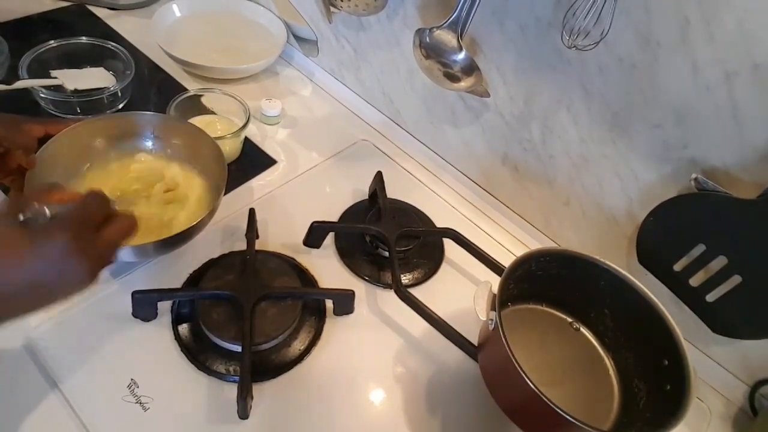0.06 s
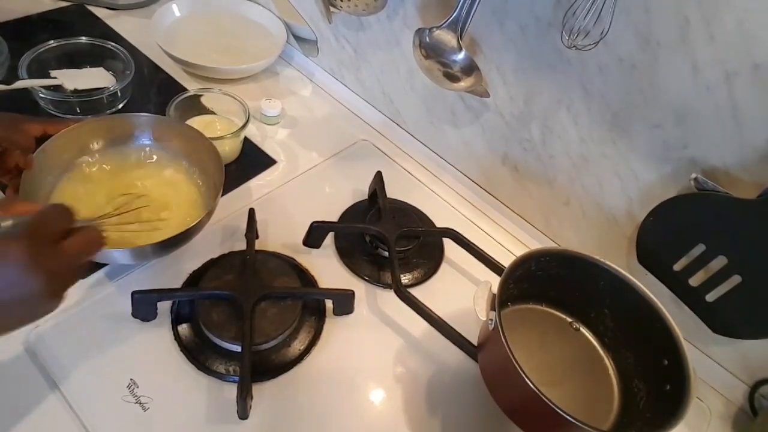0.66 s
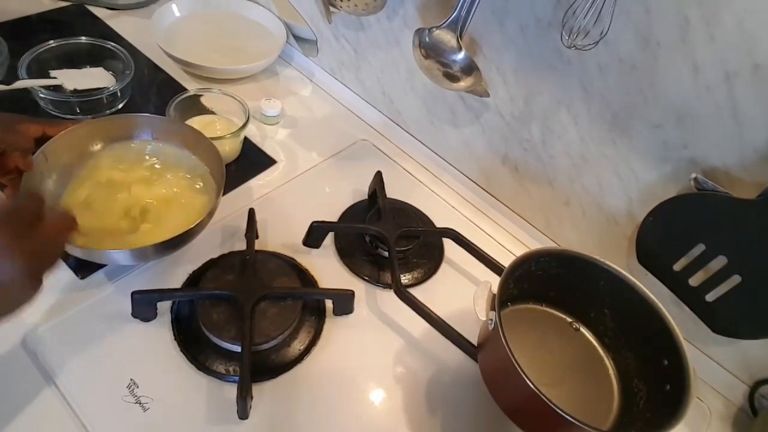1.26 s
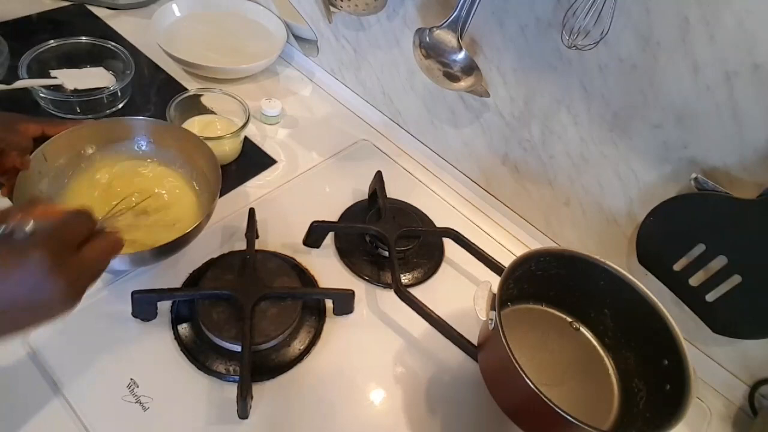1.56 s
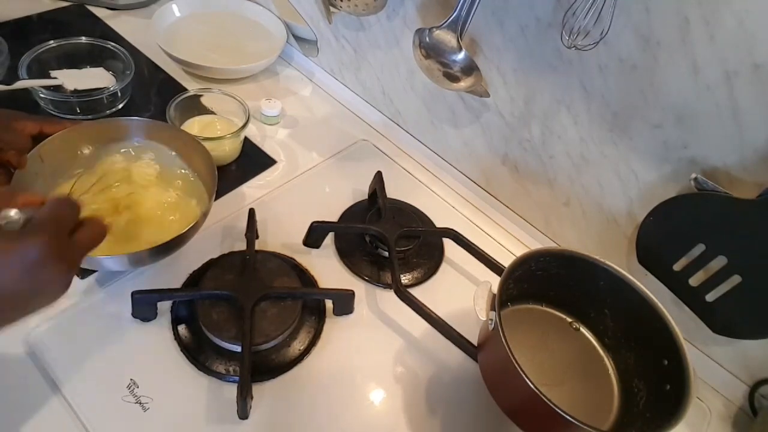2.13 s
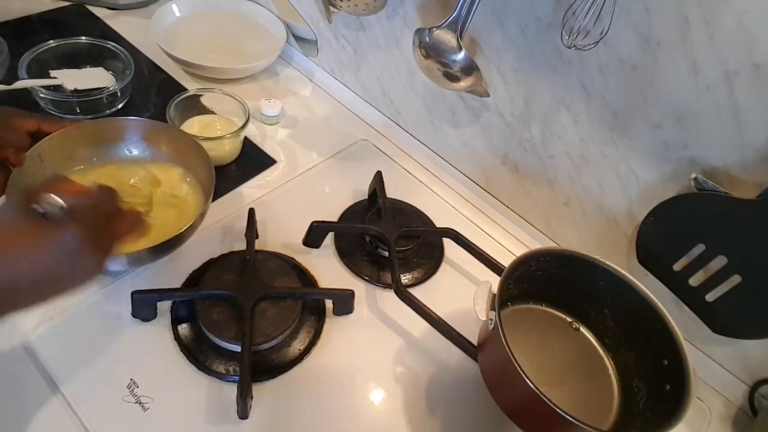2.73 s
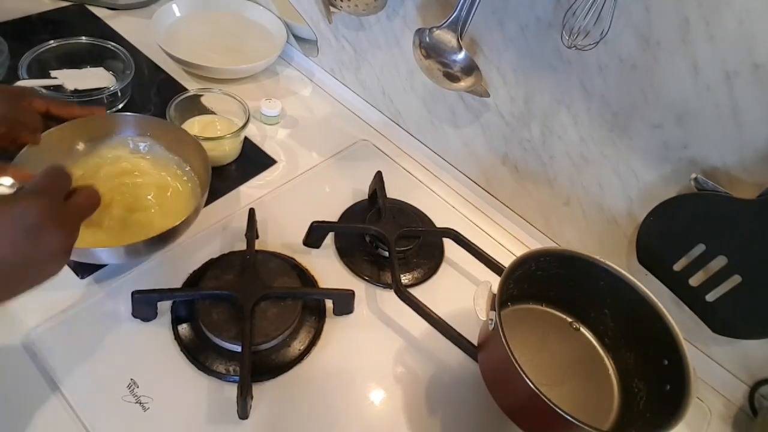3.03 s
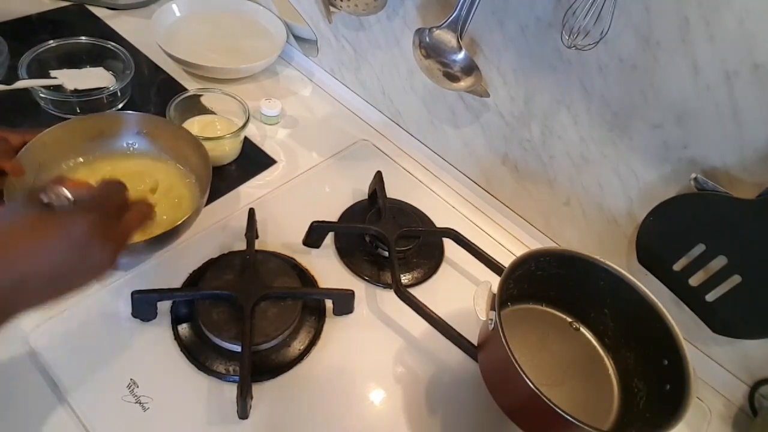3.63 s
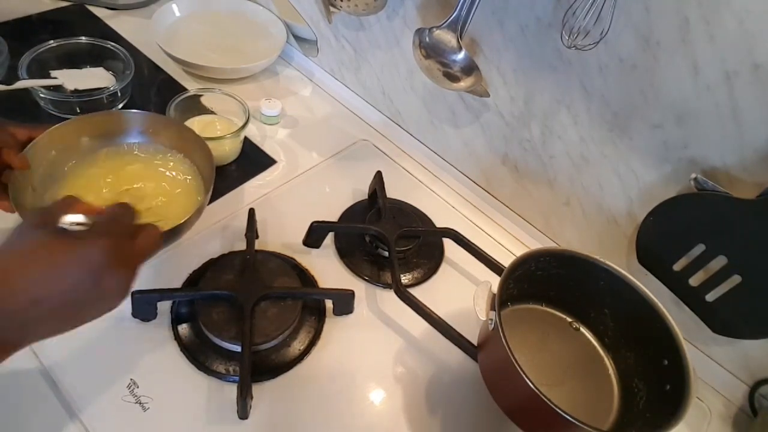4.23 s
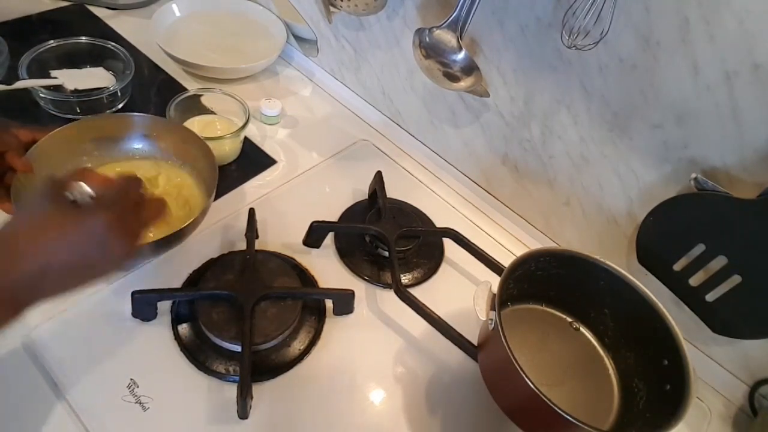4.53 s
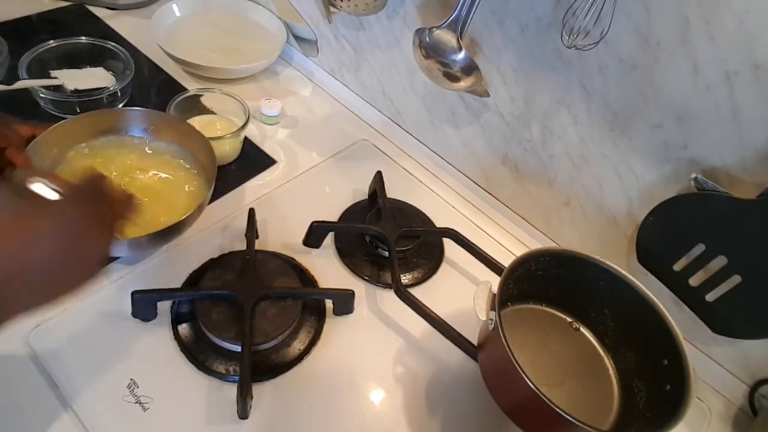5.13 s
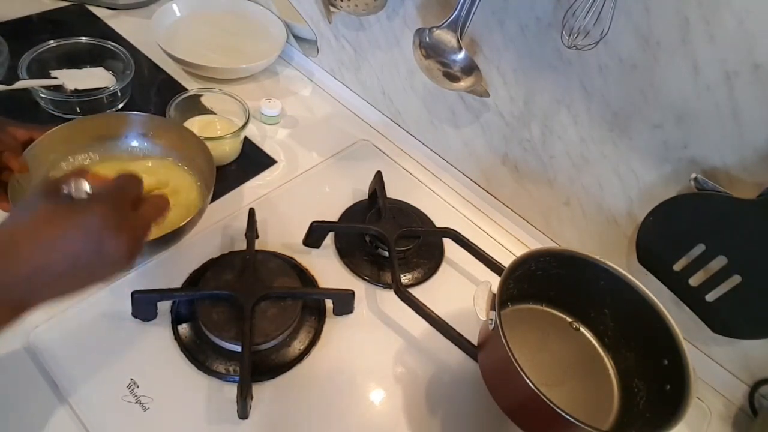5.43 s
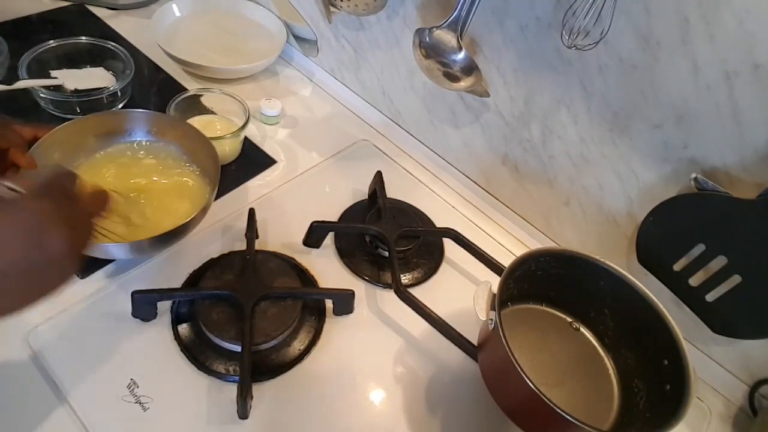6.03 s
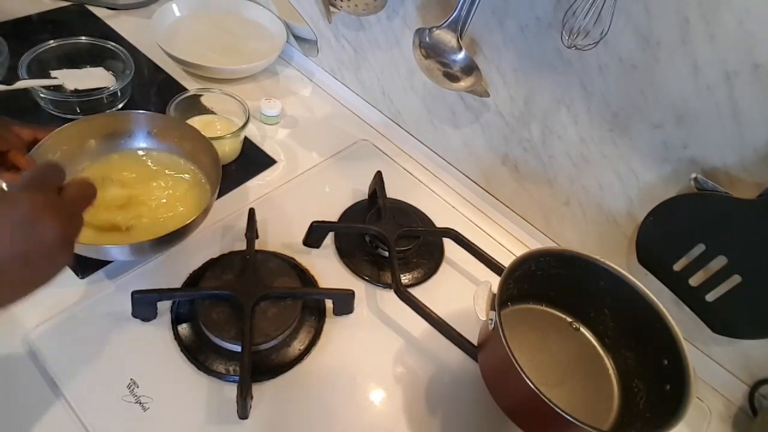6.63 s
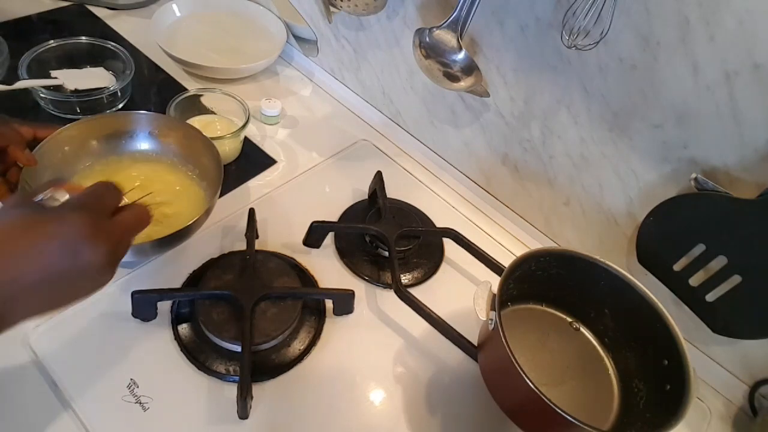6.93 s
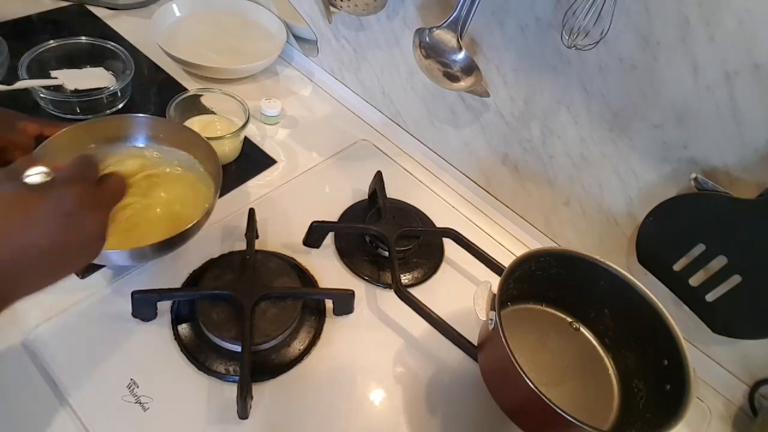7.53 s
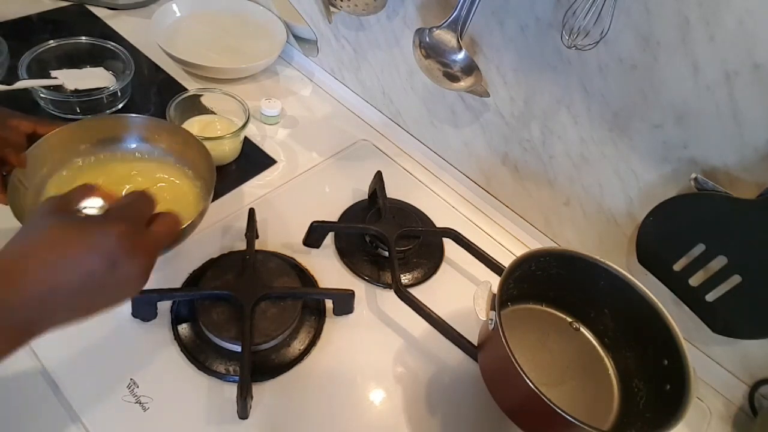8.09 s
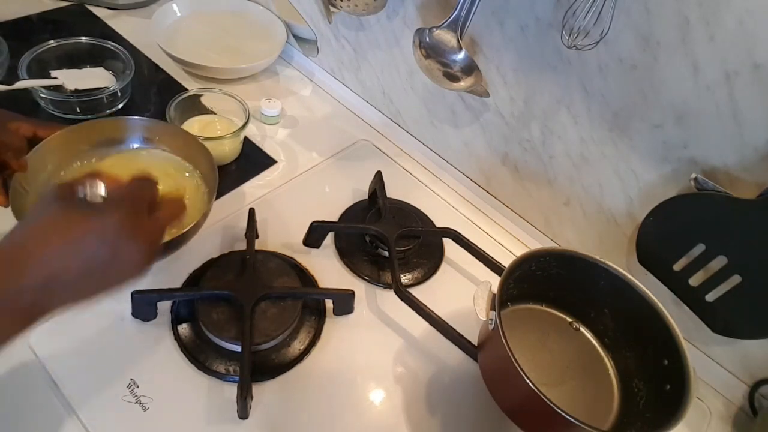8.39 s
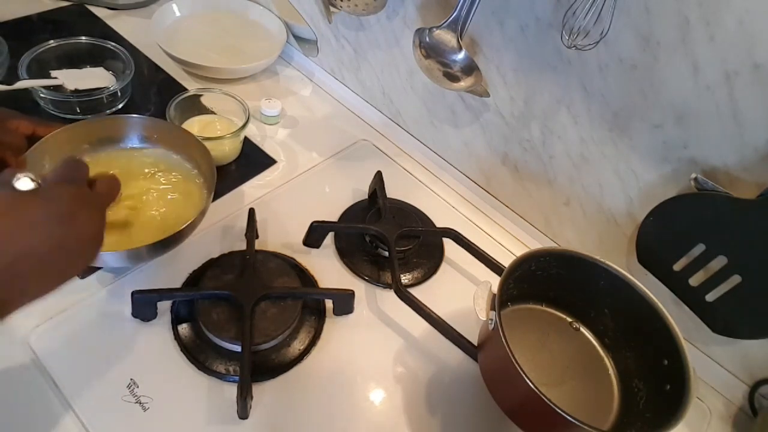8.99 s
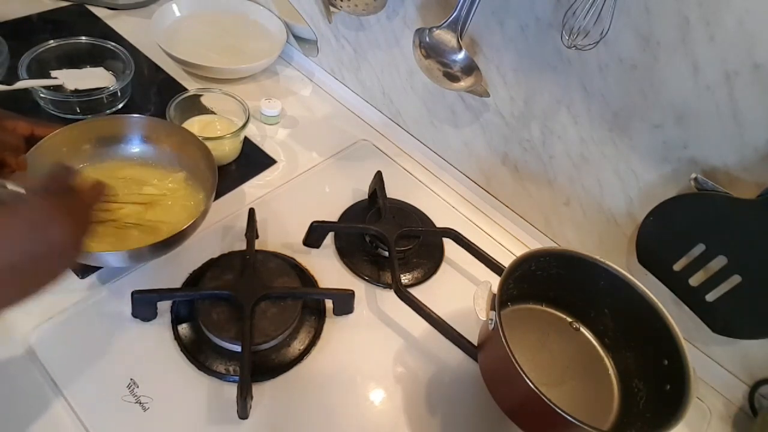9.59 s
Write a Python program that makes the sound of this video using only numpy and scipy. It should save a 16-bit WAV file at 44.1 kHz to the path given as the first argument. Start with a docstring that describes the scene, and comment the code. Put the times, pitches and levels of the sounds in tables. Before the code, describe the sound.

Quick, continuous whisking in a stainless steel bowl: ticking wires, sloppy batter pops and a few sharper metal clinks.

```python
"""Whisk wires tap a stainless steel bowl of batter: a push and a return per turn, about nine strokes/s.
The wires rattle on the damped bowl, the batter squelches, air pockets pop, steel clinks now and then.
The bowl stands on a hob in a small kitchen; the worktop thuds under the strokes, over a faint hum.
The right microphone hears it all; the muffled left one gets little but rumble and hiss."""
import sys
import numpy as np
from scipy import signal
from scipy.fft import rfft, irfft
from scipy.io import wavfile
from scipy.ndimage import uniform_filter1d

SR = 44100
rng = np.random.default_rng(int(sys.argv[2]) if len(sys.argv) > 2 else 0)


def log_audio(samples):
    """Write samples as a 16-bit WAV file to the path given in sys.argv[1]."""
    # one column per channel
    frames = np.atleast_2d(samples).T
    # limit to full scale, then quantise
    limited = np.clip(frames, -1, 1)
    pcm = np.round(limited * 32767).astype(np.int16)
    wavfile.write(sys.argv[1], SR, pcm)


N = 429975
TIME_S = np.arange(N) / SR
EVENT_S = TIME_S[:SR // 6]  # time axis of one blow

# Table levels are relative, ahead of the mix gains.
# circling of the whisk: (time [s], turns done [count])
WHISK_TURNS = [(-0.07, 0), (1.1, 5), (1.98, 9), (2.875, 13), (3.805, 17), (4.02, 18), (4.47, 20),
               (4.96, 22), (5.19, 23), (6.275, 28), (6.9, 31), (7.405, 33), (7.87, 35), (8.345, 37),
               (8.85, 39), (9.07, 40), (9.71, 43)]
# hand: (time [s], batter drive [dB], wire pressure [dB], worktop push [dB], squelch pitch [Hz])
HAND_EFFORT = [(0, -54, -41, -79, 2020), (0.65, -55, -59, -59, 1514), (1.3, -54, -53, -57, 1393),
               (1.8, -54.5, -59, -61.5, 2316), (2.7, -51, -50, -47.5, 2610), (3.3, -56, -66, -49.5, 1726),
               (3.6, -55, -57, -62, 2410), (3.85, -49, -57, -54, 1970), (4.5, -50, -61, -52, 2604),
               (4.95, -54, -68, -50, 3004), (5.25, -48, -39, -47.5, 2250), (5.75, -49.5, -44, -48.5, 1830),
               (6.15, -53, -69, -46, 1735), (6.55, -48, -46, -48.5, 1102), (7.2, -53, -52, -48, 1488),
               (7.8, -49, -52.5, -46, 2840), (8.5, -58, -45.5, -55, 2415), (9.3, -50, -32, -45.5, 1506),
               (9.75, -47, -44, -45.5, 1706)]
# hard wire hits on the bowl: (time [s], level [dB], treble re level [dB])
HARD_TAPS = [(0.005, -47, -11.5), (0.147, -45.5, -11.5), (0.277, -56, -2.5), (0.625, -56, -3.5),
             (0.846, -44.5, -10.5), (1.461, -59.5, -1), (1.53, -63, 8), (1.745, -45.5, -13.5),
             (1.876, -59.5, 5), (1.978, -56, -2), (2.075, -42, -12), (2.198, -50.5, -3.5),
             (2.297, -45, -6.5), (2.518, -44.5, -16.5), (2.546, -59, -5), (2.645, -47.5, -17),
             (2.686, -47.5, -10), (2.741, -39.5, -10.5), (2.863, -41.5, -9.5), (2.887, -59, -3.5),
             (3.032, -53, -7.5), (3.243, -62, 0.5), (3.104, -50.5, -6.5), (3.333, -44.5, -14.5),
             (3.427, -44, -5.5), (3.838, -51.5, 0.5), (3.894, -43, -16), (4.004, -48, -16),
             (4.111, -43.5, -15), (4.203, -39.5, -4), (4.243, -44, -5.5), (4.33, -42.5, -9.5),
             (4.396, -47.5, -8.5), (4.463, -47.5, -5.5), (4.574, -40.5, -9.5), (4.682, -45, -6),
             (4.967, -55.5, 3.5), (5.16, -42.5, -9), (5.295, -45.5, -3), (5.368, -56.5, 0),
             (5.474, -41.5, -15.5), (5.517, -51, -3), (5.61, -50, -16), (5.728, -45, -17),
             (5.829, -44.5, -9.5), (6.05, -39.5, -8.5), (6.069, -45.5, -15), (6.263, -31.5, -16),
             (6.357, -47, -15), (6.372, -39, -19), (6.459, -48, -4.5), (6.467, -31.5, -13),
             (6.576, -40, -12.5), (6.673, -38, -16.5), (6.706, -42, -18), (6.78, -43.5, -8.5),
             (6.877, -52, -14), (6.889, -39.5, -15), (7.005, -40, -7.5), (7.14, -46.5, -17),
             (7.4, -60.5, 3.5), (7.591, -50, -3), (8.217, -43, -11.5), (8.28, -50.5, -2.5),
             (8.586, -41.5, -0.5), (8.604, -56, 6.5), (8.707, -49, -4.5), (8.841, -39, -4),
             (8.862, -49.5, -1), (8.903, -49.5, -9.5), (9.053, -37.5, -15), (9.148, -40.5, -10),
             (9.159, -43.5, -11.5), (9.261, -43, -10), (9.272, -34, -14.5), (9.366, -42.5, -6),
             (9.383, -40.5, -12.5), (9.409, -42.5, -12), (9.477, -42, -15), (9.506, -43.5, -19),
             (9.694, -37, -16.5), (9.718, -48, -12.5)]
# bowl, damped by batter and hand: (frequency [Hz], width [Hz], level [dB])
BOWL_MODES = [(572, 28, 0), (795, 30, -6), (905, 30, -5), (1000, 35, -2), (1065, 35, 1), (1155, 32, 2),
              (1410, 45, -1), (1585, 55, 5), (1690, 45, 1), (2320, 50, -1), (2525, 55, 0), (3135, 50, -5),
              (3440, 90, -7), (3970, 110, -11), (4550, 200, -14), (5350, 150, -15), (5700, 150, -14),
              (6160, 120, -16), (7560, 160, -11), (8400, 250, -12)]
# crack of a landing wire: (frequency [Hz], density [dB])
CRACK_SPECTRUM = [(300, -20), (900, -8), (2500, 0), (5000, -5), (8300, -3.5), (9500, -17.5), (16000, -20.5)]
# large air pockets: (time [s], level [dB], pitch [Hz])
AIR_POCKETS = [(0.082, -50.5, 3000), (0.171, -42.5, 2500), (0.214, -49.5, 2500), (0.278, -45.5, 1238),
               (0.389, -51.5, 610), (0.417, -49, 2340), (0.54, -54, 2410), (0.664, -52.5, 725),
               (0.679, -52, 1314), (0.844, -46.5, 2200), (0.8, -58, 940), (1.053, -57.5, 986),
               (1.102, -42, 1416), (1.15, -46, 1640), (1.164, -48, 1300), (1.275, -54, 650),
               (1.288, -52, 880), (1.299, -49, 940), (1.314, -58, 1240), (1.334, -50.5, 1700),
               (1.36, -53, 1100), (1.418, -52, 1520), (1.557, -53, 1590), (1.571, -48.5, 2220),
               (1.628, -46.5, 2870), (1.667, -51.5, 2330), (1.781, -51.5, 2810), (1.857, -51, 1197),
               (1.963, -48.5, 2370), (2.223, -48, 1640), (2.316, -47, 495), (2.397, -57, 1730),
               (2.432, -50, 697), (2.475, -49.5, 1850), (2.699, -41.5, 4020), (2.958, -51.5, 787),
               (2.968, -46, 2280), (3.134, -50, 1305), (3.196, -49.5, 1298), (3.294, -53, 2260),
               (3.493, -53, 2150), (3.524, -52, 2240), (3.556, -46.5, 2160), (3.566, -52.5, 1140),
               (3.67, -53.5, 2550), (3.704, -52, 524), (3.785, -46.5, 2420), (3.8, -42, 2260),
               (3.812, -52, 1710), (3.948, -54.5, 2470), (4.28, -40, 2500), (4.419, -46, 2270),
               (4.455, -40, 2250), (4.509, -46, 2280), (4.703, -45.5, 996), (4.721, -40.5, 4230),
               (4.773, -51, 2250), (4.816, -54, 1815), (4.923, -52, 3010), (4.975, -46, 1690),
               (5.044, -50.5, 3610), (5.186, -41.5, 2730), (5.197, -45, 954), (5.202, -40.5, 2010),
               (5.247, -48, 3750), (5.261, -49, 1230), (5.409, -46, 2790), (5.652, -48, 2950),
               (5.684, -40, 2550), (5.86, -47.5, 3220), (5.93, -54, 1296), (6.198, -51, 2360),
               (6.231, -52, 2260), (6.42, -47.5, 1700), (6.546, -46.5, 612), (6.552, -36.5, 3320),
               (6.593, -52.5, 786), (6.614, -48, 1550), (6.647, -51, 1920), (7.122, -53.5, 1740),
               (7.157, -55, 1170), (7.254, -54, 986), (7.376, -50.5, 2600), (7.4, -44.5, 2130),
               (7.43, -55, 2630), (7.485, -52, 996), (7.561, -51, 3100), (7.617, -44.5, 2340),
               (7.657, -41.5, 3470), (7.694, -47, 588), (7.851, -42, 3460), (7.876, -42.5, 1504),
               (7.964, -49, 2240), (8.005, -54.5, 850), (8.08, -47.5, 2420), (8.114, -47, 2300),
               (8.158, -55, 1840), (8.342, -40, 1710), (8.665, -52.5, 1480), (8.756, -52.5, 790),
               (8.795, -49.5, 1320), (8.935, -48.5, 1426), (8.984, -51, 2060), (9.119, -46.5, 2320),
               (9.149, -43, 1420), (9.209, -50.5, 680), (9.217, -50.5, 804), (9.226, -50, 1420),
               (9.234, -54, 2190), (9.344, -45.5, 2130), (9.368, -47, 1410), (9.563, -47, 1080),
               (9.575, -46, 4340), (9.584, -51, 1210), (9.596, -51, 2330), (9.625, -53.5, 900),
               (9.738, -43, 2430)]
# tearing batter: (frequency [Hz], density [dB])
BATTER_SPECTRUM = [(300, -17.5), (600, -2), (1100, -0.5), (2400, 0), (4000, -5), (6500, -9.5), (8500, -5.5),
                   (9700, -20), (16000, -23)]
# steel on steel: (time [s], level [dB], bowl knock [dB], wire song [dB], decay [s])
STEEL_CLINKS = [(0.725, -55, -82, -45.5, 0.0038), (0.885, -49.5, -79, -50.5, 0.0032),
                (2.075, -32.5, -62, -43, 0.0023), (4.66, -43.5, -68, -70, 0.0021),
                (5.029, -37.5, -54, -57, 0.0056), (7.2264, -23, -39.5, -56, 0.0045),
                (8.421, -32, -75, -38, 0.0058), (8.444, -46, -69, -46.5, 0.019)]
# crowded high modes of a clink: (frequency [Hz], density [dB])
STEEL_SPECTRUM = [(700, -38), (1500, -23.5), (5000, -19), (6300, -27.5), (7700, -8.5), (8600, 1),
                  (9400, -26.5), (12500, -25), (16000, -34)]
# thin song of a struck wire: (frequency [Hz], density [dB])
WIRE_SPECTRUM = [(3000, -16), (6500, -5), (10000, -13), (12500, -13), (16000, -14)]
# wires springing free: (time [s], level [dB], pitch [Hz])
WIRE_FLICKS = [(0.248, -54, 12500), (1.128, -42, 7000), (1.853, -42.5, 5000), (2.7, -42, 5500),
               (3.287, -54.5, 12500), (4.069, -42.5, 5600), (4.429, -44, 8000), (4.518, -44, 7200),
               (4.706, -55, 12500), (4.727, -40, 4850), (4.77, -52, 13500), (4.967, -40, 5100),
               (5.2, -52, 12000), (5.494, -54, 12500), (7.63, -39, 5200), (8.587, -50, 7600),
               (8.841, -45, 12000), (8.954, -51, 12500), (9.41, -50, 12000)]
# one wire ticking on steel: (frequency [Hz], density [dB])
TICK_SPECTRUM = [(400, -32), (1500, -3), (3000, -22), (5500, 6.5), (8500, -9), (9700, -11.5), (16000, -20)]
# hardest shoves of the bowl on the worktop: (time [s], level [dB])
BOWL_SHOVES = [(2.133, -50), (4.243, -44), (4.691, -46.5), (5.621, -43), (5.841, -46), (6.066, -43),
               (7.227, -43.5), (7.861, -48), (8.331, -43.5), (9.289, -47)]
# worktop: (frequency [Hz], width [Hz], level [dB])
WORKTOP_MODES = [(59, 3.9, -30), (127, 20, -5), (148.1, 2.6, 8), (247.3, 4.2, -2), (384, 26, -12)]
# hum: (time [s], level [dB])
HUM_LEVEL = [(0, -81), (2.5, -58), (4.5, -58), (5.6, -51.5), (6.5, -55.5), (8.7, -60), (9.75, -61)]
# noise floor, open microphone: (frequency [Hz], density [dB])
ROOM_SPECTRUM = [(20, 12), (60, 1.5), (90, -8), (140, 6.5), (195, -8.5), (240, -10), (320, -11),
                 (1000, -10), (3000, -15.5), (8500, -22.5), (10000, -31.5), (16000, -26.5)]
# noise floor, muffled microphone: (frequency [Hz], density [dB])
MUFFLED_SPECTRUM = [(20, 2), (100, 11.5), (150, -2), (240, 4.5), (500, -5), (2000, -11.5), (5000, -21),
                    (9500, -25), (15500, -16)]

LEAD_S = .014  # wires land this long before mid-stroke
DEEP_HZ = 1100  # pockets below this pitch lie deep in the batter


def whisk_strokes(count=88, return_s=.1, return_db=-2, reach_s=.032, jitter_s=.0016, spread_db=1.17):
    """Uneven pushes and returns; a stroke locks to a hard tap or shallow pocket within reach."""
    turn, is_return = np.divmod(np.arange(count), 2)
    lag, force, detune = rng.standard_normal((count, 3)).T
    turn_s, turns = np.transpose(WHISK_TURNS)
    beat_s = np.interp(turn, turns, turn_s) + return_s * is_return
    tapped_s = nearest_row(HARD_TAPS, beat_s - LEAD_S)[0] + LEAD_S
    hard = np.abs(tapped_s - beat_s) < reach_s
    mid_s = np.where(hard, tapped_s, beat_s + jitter_s * lag)
    pop_s, _, pop_hz = nearest_row(AIR_POCKETS, mid_s)
    opens = (np.abs(pop_s - mid_s) < reach_s) & (pop_hz > DEEP_HZ)
    mid_s = np.where(opens & ~hard, pop_s + LEAD_S / 2, mid_s)
    drive_db, wire_db, push_db, hand_hz = along(HAND_EFFORT, mid_s)
    uneven_db = spread_db * force
    return dict(s=mid_s, hard=hard, hz=np.where(opens, pop_hz, hand_hz * 2 ** (.25 * detune)),
                drive_db=drive_db + uneven_db + return_db * is_return,
                wire_db=wire_db + uneven_db,
                push_db=push_db + uneven_db + return_db * is_return)


def light_taps(strokes, gain_db=-2.5, treble_db=-11.5, spread_db=8.5, dulling=.84):
    """Tap rows for strokes without a hard hit: a light touch, duller under more pressure."""
    db = strokes["wire_db"]
    bright_db = treble_db - dulling * (db - db.mean()) + spread_db * rng.uniform(-.57, 1, len(db))
    rows = np.transpose([strokes["s"] - LEAD_S, db + gain_db, bright_db])
    return list(rows[~strokes["hard"]])


def wire_taps(taps, crack_db=7, crack_s=.00046, split_hz=3050, body_db=2.5, treble_db=13.5, drag_s=.0048):
    """One wire lands, the rest follow and ring the bowl; dull contacts drag longer and crack less."""
    out = np.zeros(N)
    for s, db, bright_db in taps:
        crack = blow_one(colour(noise_burst(crack_s), CRACK_SPECTRUM))
        bowl = blow_one(ring(BOWL_MODES, spread_db=2.5))
        response = bowl + from_db(crack_db + .69 * min(bright_db, 0)) * crack
        contacts = rattle(per_s=2500, fade_s=drag_s * from_db(-.35 * bright_db), first=1.7)
        tap = strike(contacts, response)
        body = blow_one(cut(tap, split_hz, "low", order=4))
        treble = blow_one(cut(tap, split_hz, "high", order=4))
        add(out, s, from_db(db + body_db) * body + from_db(db + bright_db + treble_db) * treble)
    return out


def pocket(hz, life_s, rise, rough):
    """An air pocket empties: a damped, gliding tone, roughened by the tearing film."""
    t = EVENT_S[:len(EVENT_S) // 3]
    decay_s = life_s * (1000 / max(hz, DEEP_HZ)) ** .63 * from_db(2 * rng.standard_normal())
    age = t / decay_s
    tear = rms_one(cut(rng.standard_normal(len(t)), 150 + hz / 8, "low"))
    phase = 2 * np.pi * np.cumsum(hz * (1 + rise * np.tanh(age - 1))) / SR
    envelope = (1 - np.exp(-hz * t)) * np.exp(-age)
    return blow_one(envelope * (np.sin(phase) + rough * tear * np.cos(phase)))


def pops(life_s=.0068, tear_db=-7, tear_s=.007):
    """Deep pockets plop roundly; the film over shallow ones tears in a run of wet snaps."""
    out = np.zeros(N)
    for s, db, hz in AIR_POCKETS:
        ragged = 1 / (1 + (DEEP_HZ / hz) ** 4)
        tone = pocket(hz, life_s, rise=rng.uniform(-.02, .08), rough=.28 + .37 * ragged)
        snaps = rattle(per_s=2300, fade_s=tear_s, first=.86)
        snaps = cut(cut(snaps, hz * .7, "high"), hz * 1.9, "low")
        tear = blow_one(colour(snaps, BATTER_SPECTRUM))[:len(tone)]
        add(out, s, from_db(db) * blow_one(tone + ragged * from_db(tear_db) * tear))
    return out


def churn(strokes, attack_s=.011, release_s=.022, rest_db=-9,
          squelch_db=-5, scrape_db=-20, spatter_db=-54.5):
    """Drive squelches, tears sticky threads and spatters; wire pressure scrapes the bowl."""
    wet, pressure = np.zeros((2, N))
    effort = from_db(along(HAND_EFFORT, TIME_S)[0] + rest_db)  # batter moves between strokes too
    t = EVENT_S - EVENT_S.mean()
    swell = np.exp(-.5 * (t / np.where(t < 0, attack_s, release_s)) ** 2)
    starts_s = strokes["s"] + t[0]
    for s, drive_db, wire_db, hz in zip(starts_s, strokes["drive_db"], strokes["wire_db"], strokes["hz"]):
        drive = from_db(drive_db) * swell
        add(wet, s, drive * squelch(hz, octaves_per_s=rng.uniform(-6, 9)))
        add(effort, s, drive)
        add(pressure, s, from_db(wire_db) * swell)
    snaps, skids = (rng.random((2, N)) < 1300 / SR) * rng.uniform(-1, 1, (2, N))
    crackle = rms_one(colour(snaps * flicker(depth_db=7, rate_hz=160), BATTER_SPECTRUM))
    skids *= flicker(depth_db=6, rate_hz=110)
    scrape = rms_one(signal.oaconvolve(skids, ring(BOWL_MODES, spread_db=0))[:N])
    lumps = rms_one(flicker(depth_db=8, rate_hz=170))
    return (from_db(squelch_db) * wet * lumps + from_db(scrape_db) * pressure * scrape
            + effort * crackle + from_db(spatter_db) * spatter(effort))


def squelch(hz, octaves_per_s, width_ratio=.17):
    """The furrow behind the whisk: a ragged cavity whose pitch slides as it changes shape."""
    pitch_hz = hz * 2 ** (octaves_per_s * (EVENT_S - EVENT_S.mean()))
    flutter = cut(rng.standard_normal((2, len(EVENT_S))), width_ratio * hz, "low")
    phase = 2 * np.pi * np.cumsum(pitch_hz) / SR
    return rms_one(flutter[0] * np.sin(phase) + flutter[1] * np.cos(phase))


def spatter(effort, count=800):
    """Tiny pockets burst, mostly under high effort; the smaller, the higher and shorter."""
    out, odds = np.zeros(N), np.cumsum(effort)
    for when, pitch, force in rng.random((count, 3)):
        at = np.searchsorted(odds, when * odds[-1])
        burst = pocket(1100 * 4 ** pitch, life_s=.0028 * from_db(-4 * pitch), rise=.02, rough=1.2)
        add(out, at / SR, np.sqrt(effort[at]) * from_db(7 * force ** 2 - 4 * pitch) * burst)
    return rms_one(out)


def clinks(tail_db=-34, tail_s=.02, strike_db=-11, strike_s=.00068):
    """Steel rings briefly over a low knock while the wire sings; the strongest modes shimmer on."""
    out = np.zeros(N)
    for s, db, knock_db, wire_db, fade_s in STEEL_CLINKS:
        steel_noise, tail_noise, wire_noise = rng.standard_normal((3, len(EVENT_S)))
        fade = np.exp(-EVENT_S / fade_s) + from_db(strike_db) * np.exp(-EVENT_S / strike_s)
        steel = blow_one(colour(steel_noise * fade, STEEL_SPECTRUM))
        wire = blow_one(colour(wire_noise * fade, WIRE_SPECTRUM))
        tail = colour(tail_noise * np.exp(-EVENT_S / tail_s), STEEL_SPECTRUM)
        shimmer = blow_one(colour(tail, STEEL_SPECTRUM)) * (1 - EVENT_S / EVENT_S[-1])
        contacts = rattle(per_s=3500, fade_s=.0028, first=.51)
        knock = blow_one(cut(cut(contacts, 710, "low"), 120, "high"))
        ringing = steel + from_db(tail_db) * shimmer
        add(out, s, from_db(db) * ringing + from_db(knock_db) * knock + from_db(wire_db) * wire)
    return out


def flicks(fade_s=.003, width_hz=1100, song_db=-7):
    """A released wire zings around its own pitch, its thin song on top."""
    out = np.zeros(N)
    for s, db, hz in WIRE_FLICKS:
        buzz = noise_burst(fade_s)
        mode = np.exp(-np.pi * width_hz * EVENT_S) * np.sin(2 * np.pi * hz * EVENT_S)
        zing = blow_one(strike(buzz, mode))
        song = blow_one(colour(buzz, WIRE_SPECTRUM))
        add(out, s, from_db(db) * (zing + from_db(song_db) * song))
    return out


def stray_ticks(strokes, scatter_s=.045, gain_db=-40.5, spread_db=15.5, zing_db=-21, per_stroke=2):
    """Single wires tick faintly on the steel around each stroke, each at its own pitch."""
    mid_s = np.repeat(strokes["s"], per_stroke)
    when, softness, pitch = rng.random((len(mid_s), 3)).T
    ticks_s = mid_s + scatter_s * (2 * when - 1)
    out, t = np.zeros(N), EVENT_S[:len(EVENT_S) // 8]
    for s, db, hz in zip(ticks_s, gain_db - spread_db * np.sqrt(softness), 3000 * 3 ** pitch):
        zing = np.exp(-t / .0023) * np.sin(2 * np.pi * hz * t)
        add(out, s, from_db(db) * blow_one((t == 0) + from_db(zing_db) * zing))
    return colour(out, TICK_SPECTRUM)


def thuds(strokes, sway_db, sway_hz=235.5, sway_s=.068):
    """Each stroke bumps the worktop and sways the bowl on it; a few shoves hit harder."""
    out, progress = np.zeros(N), EVENT_S / EVENT_S[-1]
    landings_s = strokes["s"] - LEAD_S
    for s, db in BOWL_SHOVES + list(zip(landings_s, strokes["push_db"])):
        push = cut(rattle(per_s=440, fade_s=.022, first=.93), 344, "low")
        thud = blow_one(strike(push, ring(WORKTOP_MODES, spread_db=3)))
        add(out, s, from_db(db) * thud * (1 - progress))
    envelope = np.sin(np.pi * progress) * np.exp(-EVENT_S / sway_s)
    for s, drive_db in zip(landings_s, strokes["drive_db"]):
        sway = envelope * np.sin(2 * np.pi * rng.normal(sway_hz, 3.2) * EVENT_S)
        add(out, s, from_db(drive_db / 2 + sway_db) * blow_one(sway))
    return out


def kitchen(x, early_s=.0035, late_db=-8.5, t60_s=.26):
    """Direct sound, close echoes off hob and wall, then the short room tail."""
    t = TIME_S[:SR // 2]
    early = rng.standard_normal(len(t)) * (rng.random(len(t)) < 2500 / SR)
    early *= np.exp(-t / early_s) * (t > .001)
    late = rng.standard_normal(len(t)) * from_db(-60 * t / t60_s) * (1 - np.exp(-t / early_s))
    echoes = .3 * early / np.linalg.norm(early) + from_db(late_db) * late / np.linalg.norm(late)
    return x + signal.oaconvolve(x, echoes)[:N]


def hum(hz=60, wander_rad=1.1):
    """A low tone that swells and eases; its phase wanders."""
    level_db, = along(HUM_LEVEL, TIME_S)
    return from_db(level_db) * np.sin(2 * np.pi * hz * TIME_S + wander_rad * drift(rate_hz=11))


def noise_floor(spectrum, level_db):
    """Steady rumble and hiss."""
    return from_db(level_db) * rms_one(colour(rng.standard_normal(N), spectrum))


def ring(modes, spread_db):
    """Impulse response of a body; each contact point weights the modes differently."""
    hz, width_hz, db = np.transpose(modes)[:, :, None]
    weight = from_db(db + spread_db * rng.standard_normal(hz.shape)) * rng.choice([-1, 1], hz.shape)
    decay = np.exp(-np.pi * width_hz * EVENT_S)
    return np.sum(weight * width_hz * decay * np.sin(2 * np.pi * hz * EVENT_S), axis=0)


def rattle(per_s, fade_s, first):
    """A first contact, then a dying run of uneven ones."""
    hits = rng.random(len(EVENT_S)) < per_s / SR
    clicks = hits * rng.uniform(-1.28, 1, len(EVENT_S)) * np.exp(-EVENT_S / fade_s)
    clicks[0] = first
    return clicks


def strike(clicks, response):
    """A body answers a run of contacts."""
    return signal.fftconvolve(clicks, response)[:len(EVENT_S)]


def noise_burst(fade_s):
    """Decaying white noise."""
    return rng.standard_normal(len(EVENT_S)) * np.exp(-EVENT_S / fade_s)


def drift(rate_hz):
    """Smooth random curve, rms 1."""
    knots = rng.standard_normal(int(N / SR * rate_hz) + 2)
    return rms_one(np.interp(TIME_S * rate_hz, np.arange(len(knots)), knots))


def flicker(depth_db, rate_hz):
    """Random gain within +/- depth_db."""
    return from_db(depth_db * np.tanh(drift(rate_hz)))


def colour(x, spectrum, size=4096):
    """Minimum-phase filter with the given spectrum."""
    hz, db = np.transpose(spectrum)
    bins_hz = np.fft.rfftfreq(size, 1 / SR)
    gain = from_db(np.interp(np.log(bins_hz + 1), np.log(hz), db))
    cepstrum = irfft(np.log(gain))
    cepstrum[1:size // 2] *= 2
    cepstrum[size // 2 + 1:] = 0
    return signal.oaconvolve(x, irfft(np.exp(rfft(cepstrum))))[:len(x)]


def cut(x, hz, kind, order=2):
    """Butterworth low- or high-pass."""
    return signal.sosfilt(signal.butter(order, min(hz, .45 * SR), kind, fs=SR, output="sos"), x + 1e-18)


def along(curve, s):
    """Columns of a curve at times s."""
    knots_s, *columns = np.transpose(curve)
    return [np.interp(s, knots_s, column) for column in columns]


def nearest_row(table, s):
    """Columns of the events closest to times s."""
    rows = np.array(table)
    return rows[np.abs(s[:, None] - rows[:, 0]).argmin(axis=1)].T


def add(track, s, sound):
    """Mix a sound in at time s."""
    start = int(s * SR)
    part = sound[max(-start, 0):max(N - start, 0)]
    track[max(start, 0):][:len(part)] += part


def from_db(db):
    """Decibels to gain."""
    return 10 ** (np.asarray(db) / 20)


def rms_one(x):
    """Scale to rms 1."""
    return x / np.sqrt(np.mean(x ** 2) + 1e-20)


def blow_one(x, size=353):
    """Scale the loudest 8 ms to rms 1."""
    return x / np.sqrt(uniform_filter1d(x ** 2, size).max() + 1e-20)


def scene():
    """Bowl and batter in the room on the right; mostly rumble and hiss on the left."""
    strokes = whisk_strokes()
    taps = HARD_TAPS + light_taps(strokes)
    ticks = stray_ticks(strokes)
    steel = wire_taps(taps) + from_db(5.5) * clinks()
    batter = from_db(9.5) * pops() + churn(strokes)
    airborne = kitchen(steel + ticks + flicks() + batter)
    room_floor = noise_floor(ROOM_SPECTRUM, level_db=-53)
    muffled_floor = noise_floor(MUFFLED_SPECTRUM, level_db=-65)
    right = airborne + thuds(strokes, sway_db=-40) + hum() + room_floor
    rumble = cut(thuds(strokes, sway_db=-29), 150, "high")
    left = from_db(-43.5) * airborne + from_db(-11) * rumble + muffled_floor
    return np.array([left, right])


def record(dry):
    """High-pass at 42 Hz, steep low-pass at 15.9 kHz."""
    low_pass = signal.ellip(10, .1, 70, 15900, fs=SR, output="sos")
    return signal.sosfilt(low_pass, cut(dry, 42, "high", order=4))


dry = scene()
out = record(dry)
log_audio(out)
```